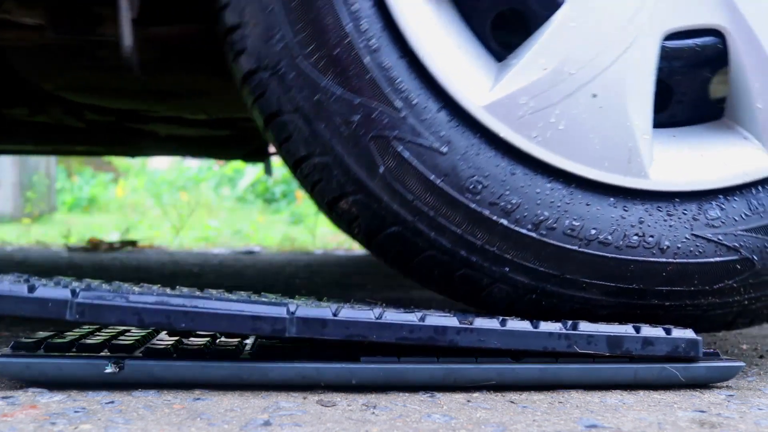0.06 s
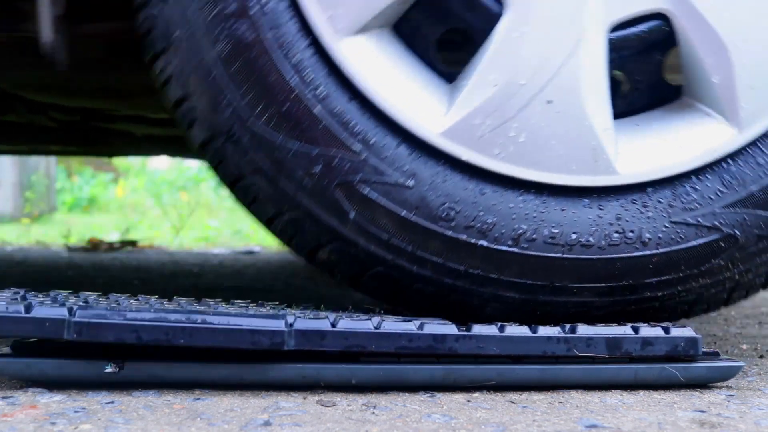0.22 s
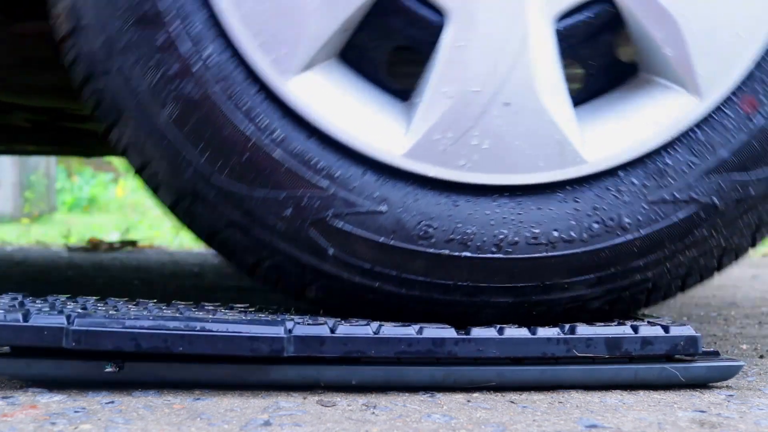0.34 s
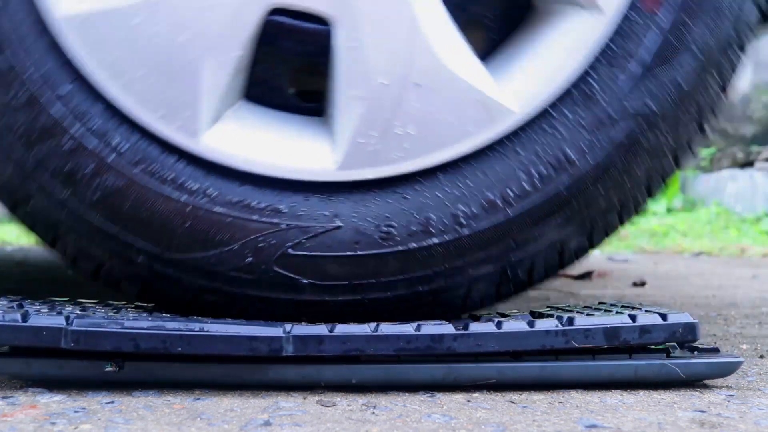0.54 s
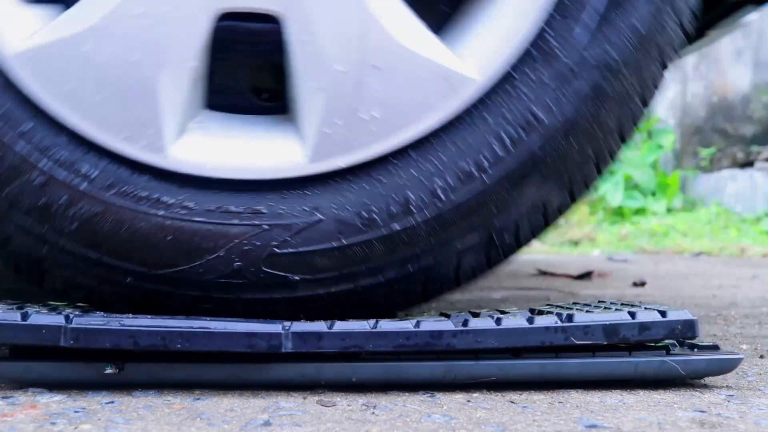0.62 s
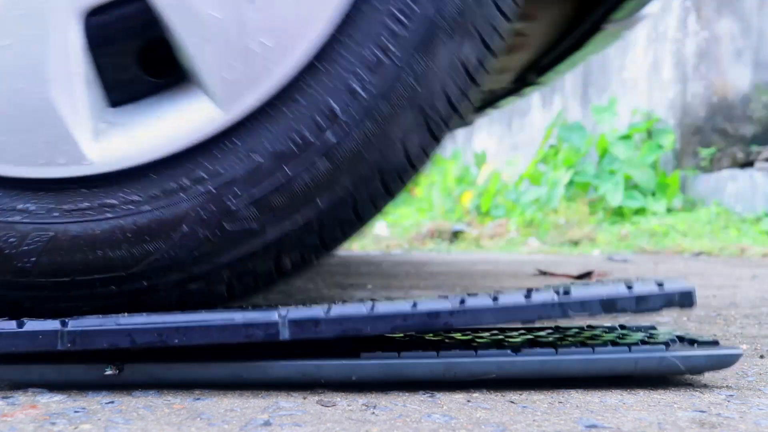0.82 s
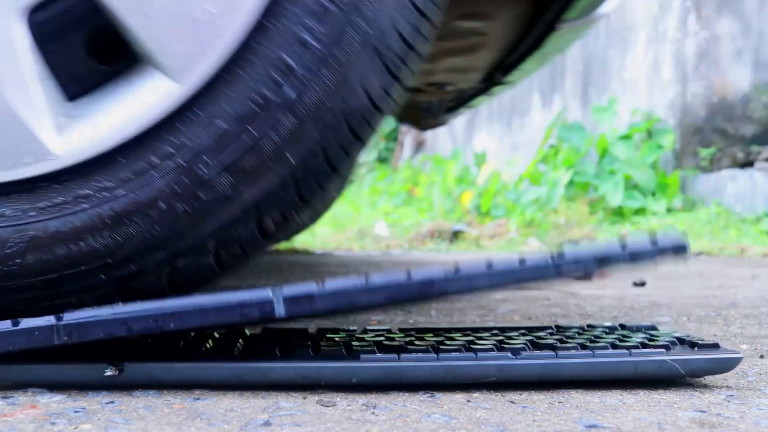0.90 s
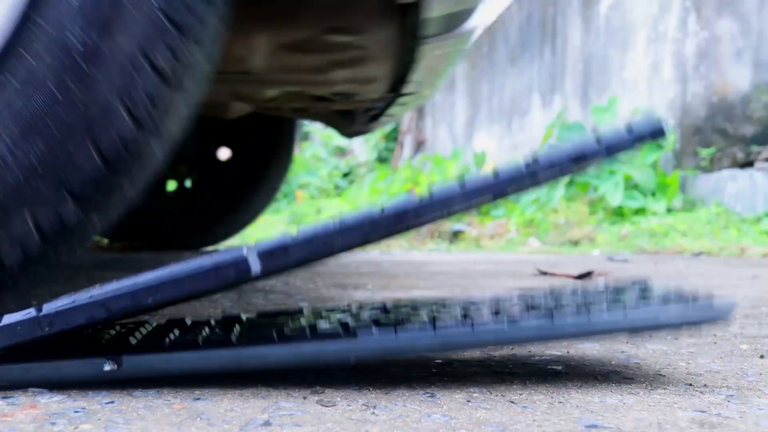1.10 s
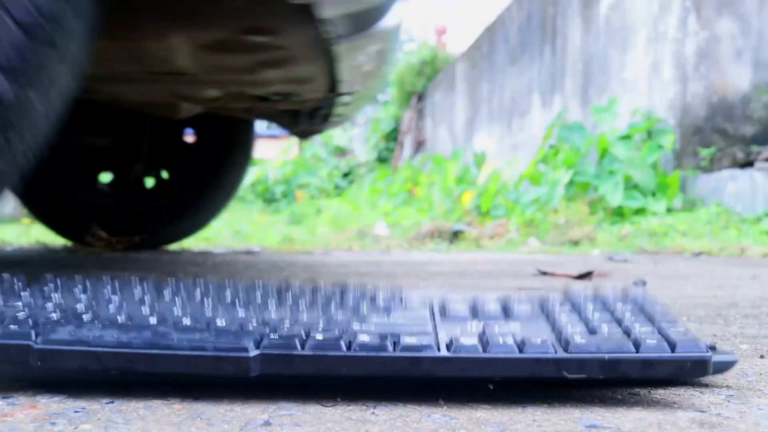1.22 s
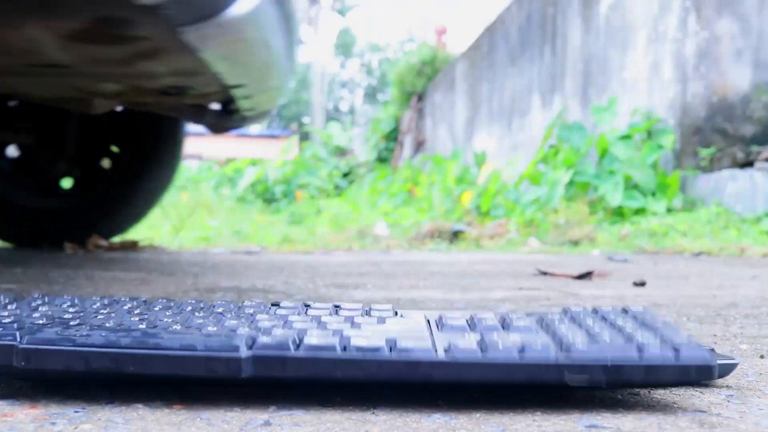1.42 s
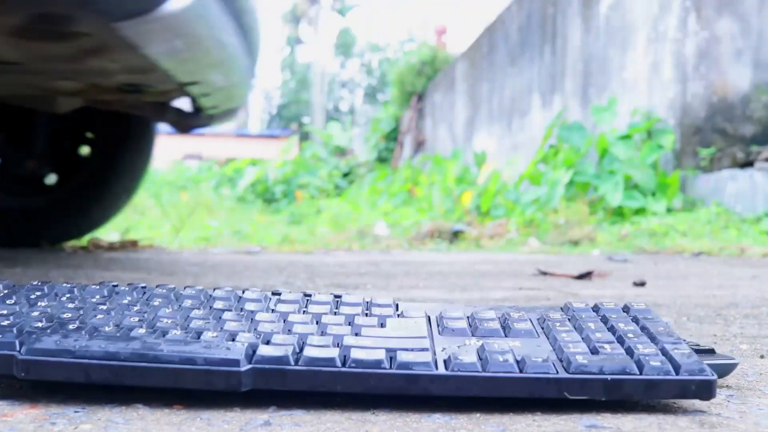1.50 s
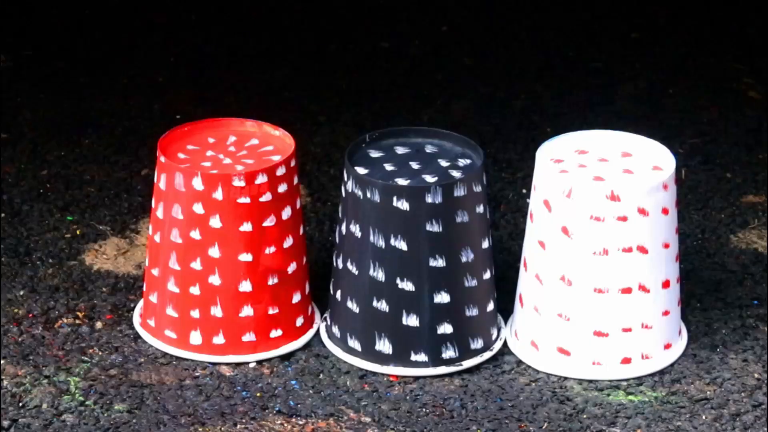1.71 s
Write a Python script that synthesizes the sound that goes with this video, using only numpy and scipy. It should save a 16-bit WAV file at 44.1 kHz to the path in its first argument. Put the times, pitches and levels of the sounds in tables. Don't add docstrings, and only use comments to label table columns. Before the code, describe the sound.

Close up outdoors on concrete, dry plastic snaps and creaks thicken as a tyre crushes a keyboard, then a brief lull, a hard clattering landing, smaller bounces, faint engine rumble and a wind bump.

```python
import sys
import numpy as np
from scipy import signal
from scipy.fft import rfft, irfft
from scipy.io import wavfile
from scipy.ndimage import uniform_filter1d

SR = 44100
rng = np.random.default_rng(int(sys.argv[2]) if len(sys.argv) > 2 else 0)


def master_out(mix):
    frames = np.transpose(np.atleast_2d(mix))
    ceiling = np.clip(frames, -1, 1)
    pcm = np.round(ceiling * 32767).astype(np.int16)
    wavfile.write(sys.argv[1], SR, pcm)


def how_loud(loudness_db):
    steps = np.asarray(loudness_db, float) / 20
    return 10 ** steps


N = 77175

# (time [s], peak [dB], shell [dB], brittle [dB])
CLIMB_SNAPS = [(0.062, -22.5, -19, 1.5), (0.079, -18.5, -28, -5), (0.162, -29.5, 0, 7.5),
               (0.182, -15, -15.5, -6.5), (0.19, -21.5, -2.5, -3), (0.21, -5.5, -31, -8),
               (0.243, -12.5, -26, -5.5), (0.272, -12, -14.5, -2), (0.291, 4, -11.5, -17),
               (0.297, -11, -13.5, -3), (0.327, -10.5, -20, -8), (0.336, -4.5, -33, -9.5),
               (0.341, -7, -26.5, -7), (0.367, -2, -22.5, -7.5), (0.388, -7, -21, -21),
               (0.395, -14.5, -5.5, 0), (0.4, 2.5, -14.5, -16.5), (0.435, -28, -2, 10.5)]
# (time [s], peak [dB], shell [dB], brittle [dB])
PRESS_SNAPS = [(0.46, -2.5, -2.5, -7.5), (0.475, -15.5, -9.5, -3), (0.49, 1, -38, -12.5),
               (0.494, -8.5, -8.5, -4), (0.515, -34, -23, -17), (0.534, -25, -29, 3.5),
               (0.544, -16, -15.5, -5.5), (0.572, -7.5, -23.5, -17), (0.577, -4.5, -23.5, -5.5),
               (0.583, -9.5, -26.5, -4), (0.588, -8.5, -19, -16), (0.604, -8, -30.5, -4.5),
               (0.656, -8.5, -30.5, -4.5), (0.663, -8, -38.5, -10), (0.673, -4, -22.5, -2.5),
               (0.685, -8, -37.5, -14), (0.694, -13, -30.5, -17), (0.708, -16, -33.5, -6),
               (0.716, -2.5, -32.5, -9.5), (0.728, 0.5, -20.5, -10), (0.73, 1.5, -45, -15.5),
               (0.749, -27.5, -16.5, -25), (0.768, -8.5, -24.5, -10)]
# (time [s], peak [dB], shell [dB], brittle [dB])
LEVER_SNAPS = [(0.799, 2, -31.5, -11), (0.806, -3, -20, -12.5), (0.812, -1, -27, -16),
               (0.818, -5, -29.5, -10), (0.824, -6.5, -35.5, -5.5), (0.83, -9, -17.5, -12.5),
               (0.842, -6.5, -34, -11.5), (0.865, -2, -15.5, -3), (0.873, 3.5, -48.5, -18),
               (0.877, 0, -21, -12), (0.904, -14.5, -25, -3), (0.924, 2.5, -12.5, -11.5),
               (0.926, 7, -17.5, -20), (0.931, -5, -45.5, -3), (0.986, -11.5, -8.5, 2),
               (0.999, -15, -20, 5), (1.007, -5.5, -15.5, -6.5), (1.034, -2, -11, -10),
               (1.049, 3, -32.5, -11.5), (1.075, -4, -9.5, -5.5), (1.087, 2, -10.5, -7.5),
               (1.098, -18.5, 0, -1.5)]
# (time [s], peak [dB], shell [dB], brittle [dB])
FALL_SNAPS = [(1.136, -17.5, -18, -4.5), (1.173, -14.5, -44, -5), (1.179, -13.5, -26, -12),
              (1.279, -13, -26, -42), (1.285, 5.5, -10.5, -17), (1.29, -2.5, -19.5, -11.5),
              (1.33, -13, -36, -2), (1.337, 1, -7.5, -11.5), (1.34, 1, -23.5, -34), (1.367, -23, -26, -21),
              (1.388, -21.5, -7, -14), (1.405, -15, -14, -30), (1.454, -10, -8, -15),
              (1.457, -9.5, -13.5, -12), (1.49, -12.5, -23.5, -11), (1.495, -8, -11.5, -12),
              (1.565, -24.5, -15, -32)]
# (time [s], peak [dB], shell [dB], brittle
# [dB])
FURTHER_SNAPS = [
    (0.2677, -0.5, -22.5, -14),
    (0.797, -6.5, -18, -2.5),
    (1.333, -1, -9.5, -10.5),
    (1.553, -26.5, -16.5, -16.5),
                 (.022, -29, -16.5, -1.5), (.041, -31, -16.5, -3), (.356, -22, -27, -14),
              (0.65, -21, -16.5, -13), (.88, -8.5, -29.5, -11), (.936, -5, -19, -13.5),
              (1.018, -18, -25.5, -6), (1.106, -12.5, -21, -13), (1.152, -23, -22.5, -3)]
# (time [s], low ring [Hz], low level [dB], high ring [Hz], high level [dB])
FLEXING_PIECES = [(.07, 1505, -15, 3550, -2.5), (.21, 890, -7, 3600, 0.5), (.268, 900, -6, 2190, -3.5),
                  (.291, 2050, -8, 3340, -0.5), (.336, 2240, -7.5, 3600, -0.5),
                  (.367, 2120, -7, 3510, -0.5), (.4, 1080, -4, 3940, -2), (.46, 865, 2.5, 4270, -7),
                  (.49, 1300, -6.5, 3560, -0.5), (.58, 1280, -7, 3840, -5.5), (.66, 1360, -3, 3250, -3),
                  (.673, 1980, -3, 3600, 1.5), (.69, 1892, 2.5, 3400, -6), (.716, 2180, 2, 3900, -7),
                  (.729, 2240, 3.5, 3800, 0), (.77, 2160, -4, 3900, 2), (.8, 1240, -6.5, 2770, 0),
                  (.813, 1370, -3.5, 2060, -4.5), (.83, 1430, -2, 3940, 5), (.865, 920, -6.5, 3600, 0.5),
                  (.876, 2370, -3, 3920, 0), (.927, 1140, -1, 2810, -7), (1.007, 2400, -1.5, 3420, 5),
                  (1.034, 880, -6, 3130, 2.5), (1.05, 2280, -2, 3480, 2.5), (1.08, 890, -5.5, 2110, -10),
                  (1.285, 948, -2, 2464, -3.5), (1.336, 1355, 1, 2600, -3.5), (1.405, 1200, 7, 2400, 2),
                  (1.455, 500, -6, 1720, -12.5), (1.496, 910, -9.5, 2300, -2)]
# (frequency [Hz], level [dB], t60 [s])
SHELL_MODES = [(467, -0.5, 0.041), (545, 0.5, 0.028), (625, 1, 0.022), (796, 6, 0.028), (897.5, 7, 0.03),
               (1014, 3.5, .02), (1240, 1, 0.028)]
# (time [s], peak [dB])
GROUND_KNOCKS = [
    (0.462, -19),
    (0.73, -19),
    (0.799, -19),
    (0.925, -18.5),
    (1.049, -24.5),
    (1.088, -17),
    (1.285, -12.5),
]
# (time [s], level [dB])
PLASTIC_LOAD = [(0, -43.5), (.16, -43.5), (.3, -46), (.44, -42.5), (.58, -39.5), (.64, -47.5), (.83, -32.5),
                (.97, -33.5), (1.1, -31), (1.2, -44.5), (1.25, -54.5), (1.4, -40.5), (1.69, -59)]
# (frequency [Hz], density [dB per Hz])
CREAK_COLOUR = [(300, -34), (600, 2), (1250, 4), (3700, -1.5), (4900, -9.5), (9000, -10), (16000, -32.5)]
# (time [s], left over right [dB])
TYRE_PAN = [(0, -4.5), (.2, -3), (.75, -1), (1.75, -1.5)]
# (time [s], firing rate [Hz], level [dB])
ENGINE_IDLE = [(0, 41.37, -35.5), (.3, 39.93, -41.5), (1.15, 39, -40.5), (1.75, 38.2, -44)]
# (multiple of firing rate [1], level [dB])
EXHAUST_NOTE = [(1, -5.5), (2, 2.5), (3, -4), (4, -9), (5, -2.5), (6, -2.5), (7, 3.5), (8, -14), (9, -18.5),
                (10, -40.5)]
# (frequency [Hz], density [dB per Hz])
ENGINE_RUMBLE = [(15, -35), (25, -0.5), (98, 3.5), (374, -8), (642, -4.5), (784, -8.5), (3000, -25),
                 (3900, -38), (6600, -120)]
# (time [s], level [dB])
WIND_GUST = [(0, -51), (1.5, -56), (1.62, -31.5), (1.65, -31.5), (1.67, -17), (1.685, -32), (1.75, -38)]


def snaps():
    rows = CLIMB_SNAPS + PRESS_SNAPS + LEVER_SNAPS + FALL_SNAPS + FURTHER_SNAPS
    s, db, shell_db, brittle_db = np.transpose(rows)
    t = np.arange(1800) / SR

    length_s = 0.001 * np.exp(0.05 * db)[:, None]
    slips = rng.standard_normal((len(s), len(t))) ** 3 * np.exp(-t / length_s)
    fade = np.exp(-t / (6 * length_s))
    grit = fade * evened(slips, size=40)
    slips[:, 8] += 10 * np.sign(slips[:, 8])
    slips = fade * evened(slips, size=20)

    keys = family(slips, low_hz=1270, high_hz=4500, t60=0.0071, db=0.73, alike=0.93,
                  tilt_db=0.13 * (brittle_db - shell_db)[:, None] - 0.5, count=20)
    splinters = family(grit + 0.5 * slips, low_hz=4800, high_hz=15500, t60=0.0057, db=10.96, alike=0.17,
                       tilt_db=-6.5, count=24)
    hz, mode_db, t60 = np.transpose(SHELL_MODES)
    detune = 1 + 0.038 * rng.standard_normal((len(s), len(hz)))
    shell = struck(hz * detune, mode_db, 0.79 * t60 * detune, 0.97, slips)
    sound = pieces(s, slips) + keys
    sound = sound + how_loud(brittle_db)[:, None, None] * splinters
    sound = sound + how_loud(shell_db + 3)[:, None, None] * shell

    out = np.zeros((2, N + len(t)))
    for start, level, one in zip((s * SR + 25).astype(int), how_loud(db), sound):
        out[:, start:start + len(t)] += level * one
    return signal.sosfilt(signal.butter(2, 340, "high", fs=SR, output="sos"), out[:, :N])


def pieces(s, slips):
    table = np.array(FLEXING_PIECES)
    nearest = np.abs(s[:, None] - table[:, 0]).argmin(axis=1)
    _, low_hz, low_db, high_hz, high_db = table[nearest].T
    pair = 1 + 0.058 * np.array([-1, 1])
    out = 0
    for hz, db in ((low_hz, low_db), (high_hz, high_db)):
        t60 = 0.0059 * (2000 / hz[:, None] * pair) ** 0.4
        out = out + how_loud(db - 6.5)[:, None, None] * struck(hz[:, None] * pair, 0, t60, 0.93, slips)
    return out


def family(slips, low_hz, high_hz, t60, db, alike, tilt_db, count):
    place = (np.arange(count) + 0.95 * rng.random((len(slips), count))) / count
    hz = low_hz * (high_hz / low_hz) ** place
    mode_db = (tilt_db * place + 36.0 * place * (1 - place))[:, None]
    return how_loud(db) * struck(hz, mode_db, t60 * how_loud(-6 * place + 2.0), alike, slips)


def struck(hz, db, t60, alike, slips):
    t = np.arange(slips.shape[-1]) / SR
    count = hz.shape[-1]
    weight = rng.standard_normal((len(slips), 2, count))
    weight[:, 0] = (-1) ** np.arange(count) * how_loud(2.05 * weight[:, 0])
    likeness = np.clip(alike, -1, 1)
    mix = np.array([[1, 0.96], [1, -0.92]]) * np.sqrt([1 + likeness, 1 - likeness])
    rings = np.sin(2 * np.pi * hz[..., None] * t) * how_loud(-60 * t / t60[..., None])
    body = np.einsum("cs,esm,emt->ect", mix, weight * how_loud(db), rings)
    out = signal.fftconvolve(body, slips[:, None], axes=2)[..., :len(t)]
    return out / np.abs(out).max(2, keepdims=True)


def rattle(x):
    t = np.arange(SR // 4) / SR
    noise = rng.standard_normal((2, len(t)))
    tail = noise[0] + signal.lfilter([1.6, -1.5], [1], noise)
    tail = tail * how_loud(-60 * t / 0.088) * (t > 0.001)
    tail = signal.sosfilt(signal.butter(1, 14200, fs=SR, output="sos"), evened(tail, size=30))
    tail = tail / np.sqrt(np.sum(tail ** 2, 1, keepdims=True))
    return how_loud(-10) * signal.fftconvolve(x, tail, axes=1)[:, :N]


def knocks():
    t = np.arange(N) / SR
    width_s = 0.0012
    return sum(how_loud(db - 5.5) * np.exp(-0.5 * ((t - s) / width_s) ** 2) for s, db in GROUND_KNOCKS)


def creak():
    cracks_per_s, spread_db = 1100, 5.3
    born = rng.random(N) < cracks_per_s * how_loud(5 * drift(40)) / SR
    size = how_loud(spread_db * np.minimum(rng.exponential(1, N), 3.0))
    grains = born * size * rng.choice([-1, 1], N)
    smear = rng.standard_normal((2, 200)) * np.exp(-np.arange(200) / 40)
    both = signal.fftconvolve(grains[None], smear + 0.5 * smear[0], axes=1)[:, :N]
    fine = rms_one(both) + 0.48 * rng.standard_normal((2, N))
    return how_loud(in_time(PLASTIC_LOAD)[0] + 5.5) * coloured(fine, CREAK_COLOUR)


def engine():
    wobble_db, rough_db, left_db = 4, 3.5, 1.5
    hz, db = in_time(ENGINE_IDLE)
    phase = 2 * np.pi * np.cumsum(hz * (1 + 0.021 * drift(6.4))) / SR
    note = sum(how_loud(level + wobble_db * drift(14)) * np.sin(k * phase + 0.71 * k) for k, level in EXHAUST_NOTE)
    noise = rng.standard_normal((2, N))
    rough = coloured(noise[0] + 0.3 * noise[1] * [[1], [-1]], ENGINE_RUMBLE)
    side = left_db * np.array([[1], [-1]])
    return how_loud(db + side) * (rms_one(note) + how_loud(rough_db) * rough)


def wind():
    band = signal.butter(2, [25, 278], "band", fs=SR, output="sos")
    low = signal.sosfilt(band, rng.standard_normal((2, N)))
    right_db = -8.5
    return how_loud(in_time(WIND_GUST)[0] + 0.83 * drift(25)) * rms_one(low) * how_loud(np.array([[0], [right_db]]))


def air():
    return how_loud(-67 + in_time(ENGINE_IDLE)[1] + 38) * rng.standard_normal((2, N))


def rms_one(x):
    return x / np.sqrt(np.mean(x ** 2) + 1e-20)


def in_time(rows):
    s, *columns = np.transpose(rows)
    return [np.interp(np.arange(N) / SR, s, c) for c in columns]


def drift(rate):
    r = np.exp(-2 * np.pi * rate / SR)
    noise = rng.standard_normal(N + SR // 4)
    return rms_one(signal.lfilter([1], [1, -2 * r, r * r], noise)[-N:])


def coloured(x, points):
    p = np.array(points)
    hz = np.maximum(np.fft.rfftfreq(N, 1 / SR), 1)
    gain = how_loud(np.interp(np.log(hz), np.log(p[:, 0]), p[:, 1]))
    return rms_one(irfft(rfft(x) * gain, N))


def evened(x, size):
    f = rfft(x)
    power = uniform_filter1d(np.abs(f) ** 2, size, axis=-1)
    return irfft(f / np.sqrt(power), x.shape[-1])


def scene():
    hits = signal.sosfilt(signal.butter(1, 9200, fs=SR, output="sos"), snaps())
    side = how_loud(in_time(TYRE_PAN)[0] / 2 * np.array([[1], [-1]]))
    keyboard = hits + rattle(hits) + creak() + knocks()
    return side * keyboard + engine() + wind() + air()


def low_pass(x):
    return signal.sosfilt(signal.butter(12, 16150, fs=SR, output="sos"), x)


def record(dry):
    cut_s, return_s, fade_s = 1.6945, 1.737, 0.0037
    mute_db, return_db = -48, -9
    t = np.arange(N) / SR
    back = how_loud(return_db) * np.clip((t - return_s) / fade_s, 0, 1)
    gate = np.where(t < cut_s, 1, how_loud(mute_db) + back)
    lowpass = signal.cheby2(10, 50, 16600, fs=SR, output="sos")
    x = signal.sosfilt(lowpass, dry * how_loud(-2.07))
    return low_pass(np.clip(x, -0.97, 0.97) * gate)


dry = scene()
out = record(dry)
master_out(out)
```